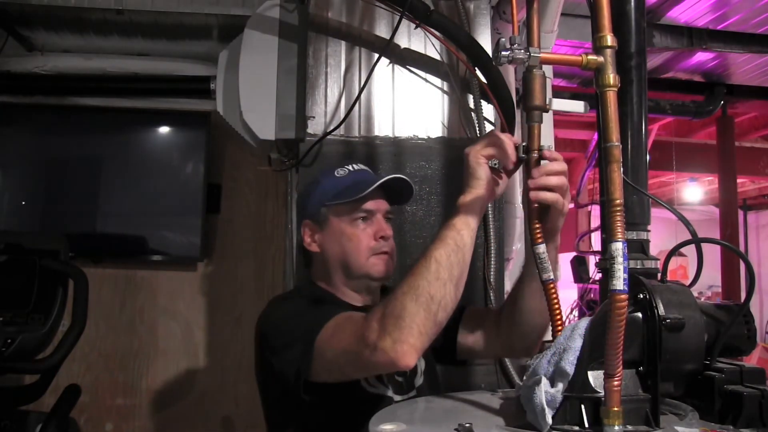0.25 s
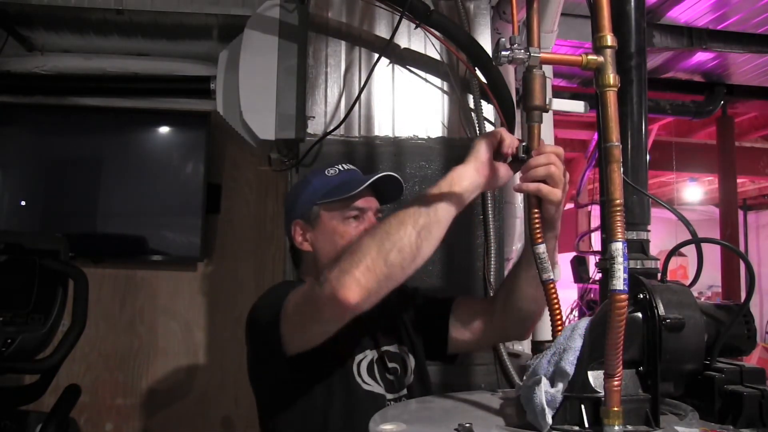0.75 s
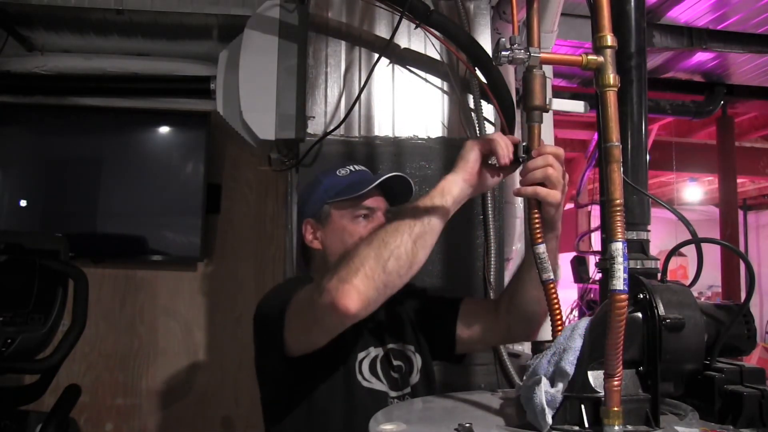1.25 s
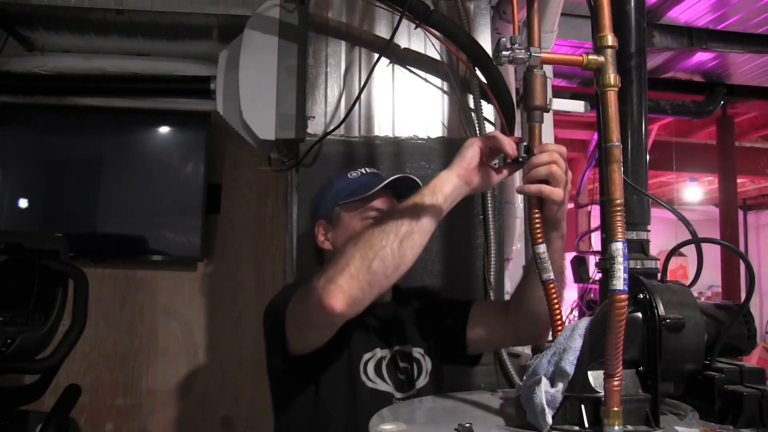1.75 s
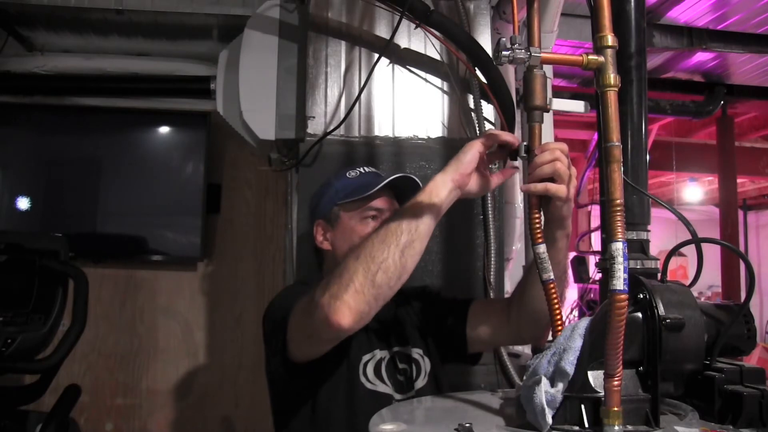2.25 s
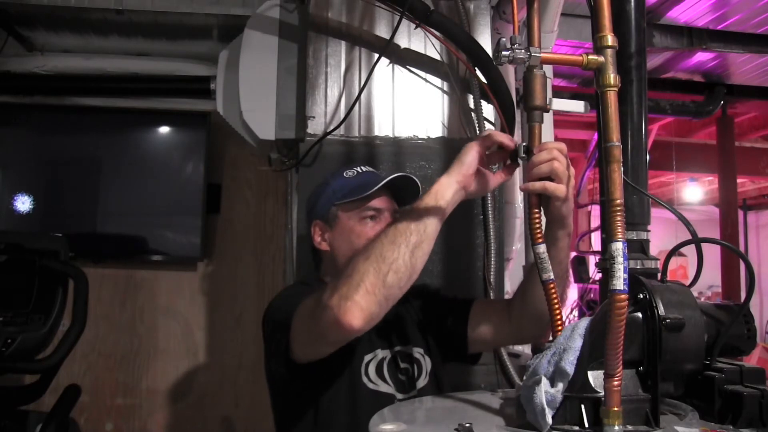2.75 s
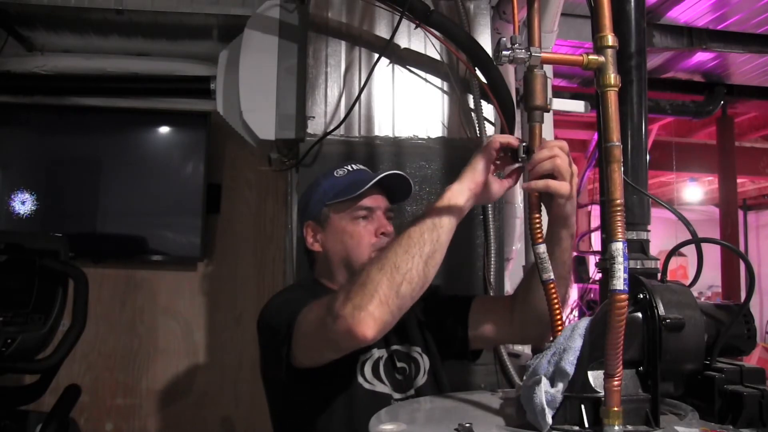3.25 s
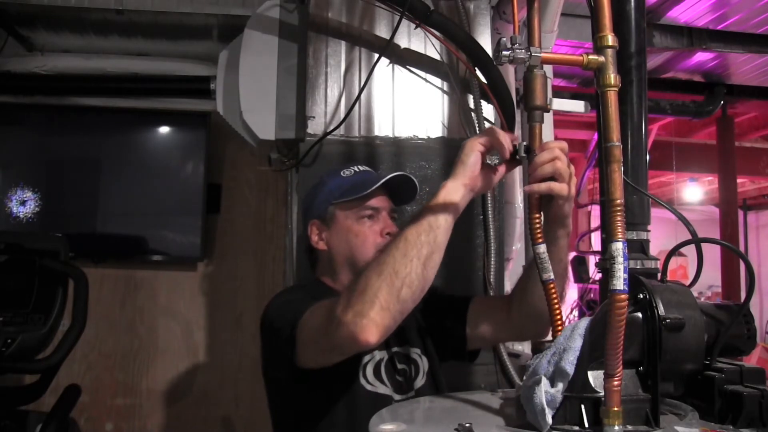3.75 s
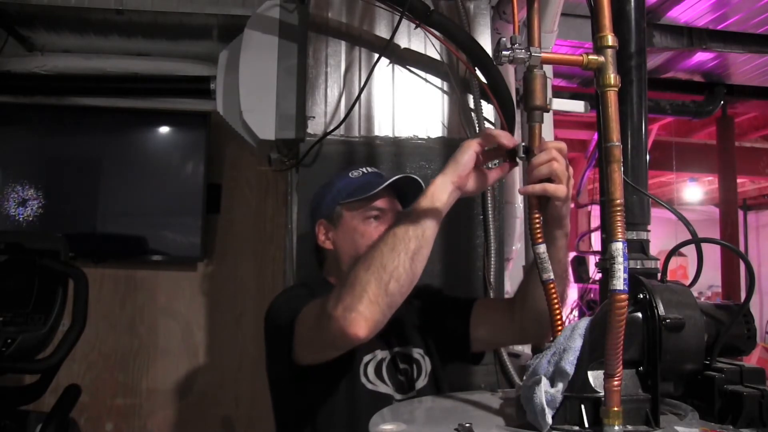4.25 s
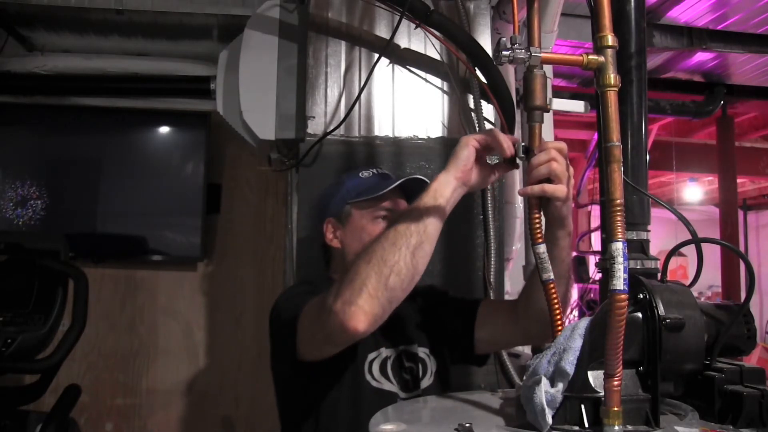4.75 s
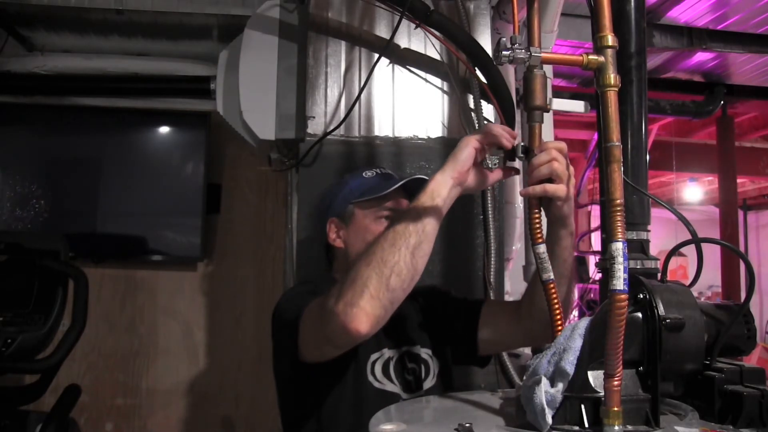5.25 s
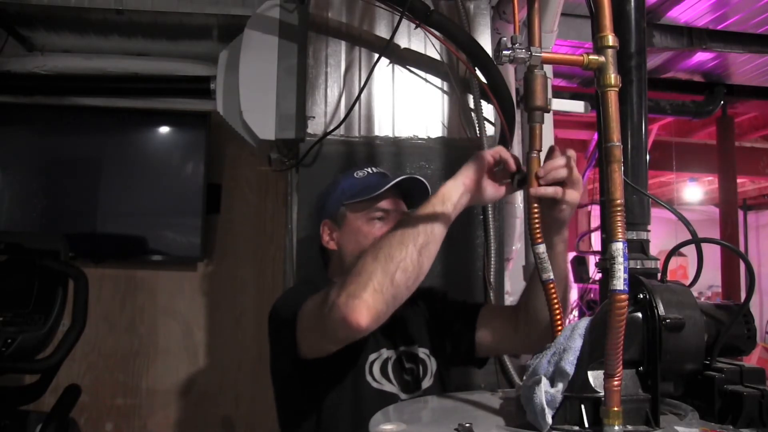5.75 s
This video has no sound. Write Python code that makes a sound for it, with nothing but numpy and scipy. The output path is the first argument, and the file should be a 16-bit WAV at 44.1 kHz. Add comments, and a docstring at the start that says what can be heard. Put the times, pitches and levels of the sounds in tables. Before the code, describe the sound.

Quiet basement air with a faint wavering hum. After a soft low rustle, small uneven clicks and muted taps come from a copper pipe held in both hands, with barely audible creeping jerks between. They end in one abrupt, booming metallic knock, a tiny rattle, then a crisper clink. Stereo microphone a few metres off, almost centred, with the room audible.

```python
"""Cutting a copper pipe by hand

A tubing cutter is worked round a copper pipe in a basement, a few metres away, over faint hum and hiss.
After a low rustle, the wheel slips in its groove with light, dull clicks: short blows on a gripped pipe.
Then the pipe lets go with a heavy knock, rattles, and metal strikes it once more. Each hard blow rings
fading sine waves for the metal and fading bands of noise for the pipework and the room."""
import sys
import numpy as np
from scipy import signal
from scipy.fft import rfft, irfft, next_fast_len
from scipy.io import wavfile

SR = 44100
rng = np.random.default_rng(int(sys.argv[2]) if len(sys.argv) > 2 else 0)


def dump_mix(stems):
    """Bounce the given channels to the path in sys.argv[1] as a 16-bit WAV at rate SR."""
    frames = np.atleast_2d(stems).T  # one column per channel
    limited = np.clip(frames, -1, 1)  # hard clip at full scale
    pcm = np.round(limited * 32767).astype(np.int16)
    wavfile.write(sys.argv[1], SR, pcm)


N = 265482
TIME = np.arange(N) / SR   # s

# In all tables t60 is the time to fade by 60 dB. A "blow" is a tuple: t/s, level/dB, bass/dB, treble/dB, contact/s
# the pipe breaks free, then is struck: t/s, level/dB, bass/dB, treble/dB, ring of cutter/dB, ring of cut end/dB
KNOCKS = [(5.5756, -10, -5.5, -2, -21.5, -25), (5.9536, -22, -4, 14, -18, -16)]
# the loose pipe rattles: t/s, level/dB, treble/dB
RATTLES = [(5.622, -24, 1), (5.633, -30.5, 10), (5.685, -27.5, -8.5), (5.709, -27.5, -3)]
# how alike left and right are in the air noise, hum and rustle: f/Hz, likeness (0-1)
AIR_LIKENESS = [(60, 0.95), (130, 0.95), (290, 0.75), (640, 0.15), (1400, 0.32), (3100, 0.59), (15000, 0.6)]


def from_db(db):
    """Turn decibels into a gain."""
    return 10 ** (np.asarray(db) / 20)


def at_hz(points, hz):
    """Read a table between its points, on a log-frequency axis."""
    known, values = np.transpose(points)
    return np.interp(np.log(np.maximum(hz, 1)), np.log(known), values)


def stereo_noise(gain_at, likeness, size):
    """Random phases on a given spectrum make two partly alike noises, with an rms of 1."""
    padded = next_fast_len(size, True)
    hz = np.arange(padded // 2 + 1) * SR / padded
    alike = np.clip(at_hz(likeness, hz), 0, 1)
    phase = 2 * np.pi * rng.random((2, len(hz)), np.float32)
    # likeness shifts energy from the side (left against right) to the mid (both together)
    gains = (gain_at(hz) * np.sqrt([1 + alike, 1 - alike])).astype(np.float32)
    mid, side = (np.cos(phase) + 1j * np.sin(phase)) * gains
    noise = irfft(np.array([mid + side, mid - side]), padded)[:, :size]
    return noise / noise.std()


def add(out, s, sound):
    """Mix a sound in at a given time in seconds."""
    start = int(np.clip(round(s * SR), 0, N - 1))
    out[:, start:start + sound.shape[-1]] += sound[..., :N - start]


def swell(start_s, end_s, rise_s, t60):
    """An envelope that rises, holds until its end and dies away."""
    rise = 1 - np.exp(-np.maximum(TIME - start_s, 0) / rise_s)
    fade = np.exp(-np.log(1000) * np.maximum(TIME - end_s, 0) / t60)
    return rise * fade


def tone_db(hz, bass_db, treble_db):
    """A heavy shove mostly moves the bass, a hard contact mostly the treble."""
    bass_share = at_hz([(300, 1), (620, 0.043)], hz)
    treble_share = at_hz([(800, 0.078), (1700, 0.94)], hz)
    return bass_db * bass_share + treble_db * treble_share


def dense_ring(blows, colour, crack_db, early_t60, tail_db, build_cycles, size=24000, hold_size=24):
    """Countless close modes, as noise bands: a crack, a quick first decay, then the tail of the room."""
    # fading time of the room: f/Hz, t60/s
    room_t60 = [(60, 2.7), (200, 0.48), (600, 0.55), (1800, 0.51), (4500, 0.48), (14000, 0.3)]
    # how alike left and right are in this ring: f/Hz, likeness (0-1)
    ring_likeness = [(60, .99), (150, 0.97), (300, 0.96), (640, 0.81), (1400, 0.74), (4000, 0.71),
                     (15000, 0.82)]
    bands = 33.5 * 2 ** (np.arange(28) / 3)   # band centres in Hz, three to the octave
    crack_t60 = 0.014   # s

    # split one noise into bands of equal loudness
    noise = rfft(stereo_noise(lambda f: from_db(at_hz(colour, f)), ring_likeness, 2 * size))
    edges = np.sqrt(bands[1:] * bands[:-1])
    nearest = np.searchsorted(edges, np.linspace(0, SR / 2, size + 1))
    in_band = nearest == np.arange(len(bands))[:, None, None]
    bank = irfft(noise.astype(np.complex64) * in_band)
    bank /= bank.std(axis=(1, 2), keepdims=True)

    # the energy of each band after a sudden blow, in steps of hold_size samples
    t, hz = TIME[hold_size // 2:size:hold_size], bands[:, None]
    crack = from_db(crack_db - 60 * t / crack_t60)
    early = from_db(-60 * t / early_t60)
    tail = from_db(tail_db - 60 * t / at_hz(room_t60, hz))
    energy = crack ** 2 + early ** 2 + tail ** 2
    energy *= (1 - np.exp(-t * hz / build_cycles)) ** 2   # low modes take longer to build up

    share = from_db(at_hz(colour, bands)) * np.sqrt(bands)   # wider bands hold more of the sound
    share /= np.linalg.norm(share)
    out = np.zeros((2, N))
    starts = rng.integers(0, size, len(blows))   # each blow uses another stretch of the noise
    for (s, level_db, bass_db, treble_db, contact, *_), start in zip(blows, starts):
        feed = np.exp(-hold_size / (max(contact, 1e-4) * SR))   # a long contact feeds its energy in slowly
        envelope = np.sqrt(signal.lfilter([1 - feed], [1, -feed], energy))
        envelope *= (share * from_db(level_db + tone_db(bands, bass_db, treble_db)))[:, None]
        envelope = np.repeat(envelope.astype(np.float32), hold_size, axis=1)
        add(out, s, np.einsum("bt,bct->ct", envelope, bank[:, :, start:start + size]))
    return out


def mode_ring(modes, blows, ring_db, rise_s, spread_db=2.5, port_angle=0.44, size=24000):
    """Each blow strikes every mode, a fading sine, anew; left and right are a little out of step."""
    hz, mode_db, t60 = np.transpose(modes)
    t, out = TIME[:size], np.zeros((2, N))
    angle = (2 * np.pi * np.outer(hz, t)).astype(np.float32)
    decay = np.exp(np.outer(-np.log(1000) / t60, t).astype(np.float32))
    waves = np.vstack([decay * np.sin(angle), decay * np.cos(angle)])
    # the phase gap grows up to 700 Hz and changes sign from one mode to the next
    skew = port_angle * np.minimum(hz / 700, 1) * (-1) ** np.arange(len(hz)) * [[1], [-1]]
    for s, level_db, bass_db, treble_db, contact, *_ in blows:
        luck_db = spread_db * rng.standard_normal(len(hz))   # no two blows excite the modes alike
        height = from_db(ring_db + mode_db + level_db + tone_db(hz, bass_db, treble_db) + luck_db)
        phase = 2 * np.pi * rng.random(len(hz)) + skew
        weights = np.hstack([height * np.cos(phase), height * np.sin(phase)]).astype(np.float32)
        rise = 1 - np.exp(-t / (abs(contact) + rise_s))   # a longer contact starts the ring more softly
        add(out, s, (weights @ waves) * rise)
    return out


def basement():
    """Steady air noise, plus narrow bands of noise that are heard as a few wavering hum lines."""
    # colour of the air noise: f/Hz, relative level per Hz/dB
    air = [(15, -40), (25, -16), (64, -10), (91, -25), (104, -7), (136, -4), (198, -6.5), (246, -6),
           (274, -11), (349, -8), (469, -13), (551, -11.5), (825, -15.5), (1850, -18), (15500, -34.5)]
    # hum of a distant appliance: f/Hz, level/dB, width/Hz
    hum = [(62.4, -69, 0.41), (158, -67, 5.9), (339, -71, 14), (1540, -74.5, 12), (1800, -72, 8.3),
           (2090, -77.5, 7.4)]
    air_db = -55.7
    hz = np.arange(SR * 2) / 4
    parts = [(air_db, from_db(at_hz(air, hz)) ** 2)]
    for centre, level_db, width in hum:
        parts.append((level_db, 1 / (1 + ((hz - centre) / width) ** 2) ** 2))
    power = sum(from_db(level_db) ** 2 * shape / shape.sum() for level_db, shape in parts)
    noise = stereo_noise(lambda f: np.sqrt(np.interp(f, hz, power)), AIR_LIKENESS, N)
    return np.sqrt(power.sum()) * noise


def rumble():
    """Low noise swells, holds and dies away as a muffled rustle; short swells make soft bumps."""
    # colour of the rustle: f/Hz, relative level per Hz/dB
    rumble_colour = [(40, -12), (90, -11), (130, -3.5), (170, -2.5), (200, -5.5), (260, -0.5), (340, -9.5),
                     (480, -21.5), (800, -20.5), (2000, -68)]
    # soft low bumps: t/s, level/dB
    bumps = [(0.604, -47.5), (1.02, -46.5), (3.92, -44)]
    level = from_db(-53) * swell(start_s=0.6, end_s=1.27, rise_s=0.043, t60=1.74)
    for s, bump_db in bumps:
        level = level + from_db(bump_db) * swell(s, s, rise_s=0.0058, t60=0.2)
    return level * stereo_noise(lambda f: from_db(at_hz(rumble_colour, f)), AIR_LIKENESS, N)


def creep(count):
    """Between slips the rollers creep round the pipe in faint jerks at uneven intervals."""
    from_s, to_s = 2.5, 5.5
    level_db, spread_db, bass_db, treble_db, contact_s = -62, 1.5, 9.5, 0.5, 0.01
    times = from_s + (to_s - from_s) * (np.arange(count) + rng.random(count)) / count
    return [(s, level_db + spread_db * rng.standard_normal(), bass_db, treble_db, contact_s) for s in times]


def slip_blows():
    """The wheel slips with a bright tick, then catches again with a dull thud; creep is added."""
    # slips of the wheel: t/s, tick level/dB, thud level/dB, brightness/dB, contact/s
    slip_table = [(1.406, -43, -42.5, 2, 0.0015), (1.438, -36.5, -38.5, 1.5, 0.00051),
                  (1.594, -46.5, -65, 7.5, 0.00034), (1.805, -48, -50.5, -12, 0.015),
                  (2.165, -46, -47.5, -11, 0.013), (2.268, -62.5, -66, 12.5, .005),
                  (2.315, -47, -59, -19, 0.0028), (2.391, -43, -46.5, -6.5, 0.0031),
                  (2.44, -44.5, -54, -5, .01), (2.473, -38, -56, -19, 0.00042),
                  (2.682, -50, -56, -3, 0.0044), (2.728, -41.5, -50.5, -2.5, .012),
                  (2.834, -51, -53, -21, 0.0088), (3.002, -38, -39, -3.5, 0.00062),
                  (3.094, -42, -44, -8, .003), (3.322, -53, -52, -18, 0.0053),
                  (3.56, -48.5, -51.5, -9, .02), (3.767, -42.5, -37.5, -0.5, 0.0046),
                  (3.906, -40.5, -41, -6.5, 0.0041), (4.222, -50.5, -46, -1.5, .011),
                  (4.53, -48, -57, -8, 0.018), (4.84, -43.5, -46.5, -2, 0.0017),
                  (5.0125, -38.5, -43, 0, 0.0012), (5.137, -42, -45.5, -16, .014),
                  (5.331, -48.5, -66, 3, 0.00063), (5.409, -40.5, -47.5, -12.5, 0.0032),
                  (5.506, -45, -41, -28, 0.0072)]
    tick_bass_db, tick_treble_db = -5, 3
    thud_bass_db, thud_treble_db = 6, -9
    bass_loss = 0.19   # dB per dB of brightness: the harder the slip, the thinner its tick
    blows = creep(count=26)
    for s, tick_db, thud_db, bright_db, contact in slip_table:
        caught_s = s + 0.012 + 1.2 * contact   # a slower slip takes longer to catch
        thin_bass_db = tick_bass_db - bass_loss * bright_db
        blows += [(s, tick_db, thin_bass_db, tick_treble_db + bright_db, contact),
                  (caught_s, thud_db, thud_bass_db, thud_treble_db + bright_db, contact)]
    return blows


def slips():
    """The wheel jerks forward in its groove and rings the pipe, muffled by the hands."""
    # colour of the dense ring of light slips: f/Hz, relative level per Hz/dB
    slip_colour = [(60, -29), (150, -6.5), (230, -8.5), (330, -0.5), (470, 0.5), (620, -4), (820, 1),
                   (1200, -8), (2000, -9.5), (2700, -16.5), (3400, -25), (4400, -26), (7000, -38),
                   (15000, -68)]
    # modes of the pipe while both hands grip it: f/Hz, level/dB, t60/s
    gripped = [(182.6, -26.5, 0.97), (286, -12.5, 0.39), (343, -15, 0.86), (430.2, -8, 0.21),
               (472.8, -11.5, 0.23), (565.3, -2.5, 0.12), (721, -12, 0.34), (772, -17, 0.25),
               (790, -46, 0.091), (918, -13.5, 0.22), (995, -14.5, 0.33), (1190, -25, 0.42),
               (1500, -17, 0.28), (1556, -26, 0.16), (1885, -21.5, .3), (2060, -24.5, .3),
               (2410, -17, 0.21), (2590, -23.5, 0.18), (2680, -50, 0.11), (2850, -45, 0.12),
               (4340, -45, 0.11)]
    blows = slip_blows()
    return (dense_ring(blows, slip_colour, crack_db=8, early_t60=0.15, tail_db=-6.5, build_cycles=1.54)
            + mode_ring(gripped, blows, ring_db=3.5, rise_s=0.0036))


REBOUND_LAG_S = 0.0105   # the pipe swings back this long after a knock


def knock_blows():
    """Every knock is a graze of metal, the hit and a slower rebound; rattles are single soft blows."""
    rattle_bass_db, rattle_contact_s = 3.5, 0.0042
    graze_lead_s, graze_db, graze_contact_s = 0.0025, -24.5, 0.0004
    knock_contact_s = 0.0003
    rebound_bass_db, rebound_treble_db, rebound_contact_s = -0.5, -2.5, 0.003
    blows = [(s, level_db, rattle_bass_db, treble_db, rattle_contact_s) for s, level_db, treble_db in RATTLES]
    for s, level_db, bass_db, treble_db, *_ in KNOCKS:
        blows += [(s - graze_lead_s, graze_db, bass_db, treble_db, graze_contact_s),
                  (s, level_db, bass_db, treble_db, knock_contact_s),
                  (s + REBOUND_LAG_S, level_db, rebound_bass_db, rebound_treble_db, rebound_contact_s)]
    return blows


def knocks():
    """Hard metal contacts shake the whole pipe run and set the cutter and the cut end ringing."""
    # colour of the dense ring of hard knocks: f/Hz, relative level per Hz/dB
    knock_colour = [(35, -14), (52, -25), (67, -14), (90, -10), (170, 0.5), (340, 2), (450, -3.5),
                    (750, -1), (1100, -8.5), (1800, -10.5), (3100, -24.5), (4300, -23), (5500, -28.5),
                    (9500, -36.5), (15000, -50.5)]
    # modes of the free pipe run and the room round it: f/Hz, level/dB, t60/s
    pipe = [(63.6, -18, 0.83), (75.1, -16, 1.53), (112.7, -8.5, 0.78), (163.5, -9.5, 0.72),
            (176.5, -8, 0.62), (237.7, -14, 0.58), (286.5, -24, 0.52), (328.7, -12.5, 0.6),
            (431, -14, 0.57), (445, -20, 0.64), (557.6, -24, 1), (567, -10.5, 0.54), (693, -17.5, 0.52),
            (761, -8, 0.43), (792, -10, 0.21), (880, -27, 0.37), (882, -0.5, 0.14), (989, -17.5, 0.47),
            (1090, -28, 0.21), (1227, -26, 0.098), (1360, -21.5, 0.37), (1560, -24, 0.43), (1606, -30, .35),
            (1850, -26, 0.15), (1880, -20, 0.36), (2030, -34, 0.19), (2335, -24, 0.42), (2920, -35, 0.32),
            (3020, -30.5, 0.41)]
    # modes of the steel cutter: f/Hz, level/dB, t60/s
    cutter = [(4160, -2, 0.039), (3900, -2, 0.03), (4180, -11, 0.11), (3930, -25, 0.092),
              (4200, 5.5, 0.047), (4270, -5, 0.078), (4600, -20, 0.22), (4550, -12, 0.13),
              (4590, -17, 0.16), (5180, -22, 0.086), (6620, -34, .1), (8600, -29, 0.081)]
    # modes of the short, freshly cut end of the tube: f/Hz, level/dB, t60/s
    cut_end = [(964, -14, 0.22), (1130, -14, 0.18), (1234, -2.5, 0.17), (1373, 6, 0.032), (1575, -11, 0.27),
               (1710, -11, 0.073), (1844, -8, 0.24), (1954, -19, 0.31), (2090, -12.5, 0.18),
               (2900, -9.5, 0.07), (3400, -23, .1)]
    rebound_cutter_db = -13.5   # the rebound rings the cutter again, more softly
    rattle_cutter_db, rattle_end_db = -9, -1   # rings relative to the rattle
    blows = knock_blows()
    on_cutter, on_end = [], []
    for s, *_, cutter_db, end_db in KNOCKS:
        on_cutter += [(s, cutter_db, 0, 0, 0),
                      (s + REBOUND_LAG_S, cutter_db + rebound_cutter_db, 0, 0, 0)]
        on_end.append((s, end_db, 0, 0, 0))
    for s, level_db, treble_db in RATTLES:
        on_cutter.append((s, level_db + rattle_cutter_db, 0, treble_db, 0))
        on_end.append((s, level_db + rattle_end_db, 0, 0, 0))
    return (dense_ring(blows, knock_colour, crack_db=2.5, early_t60=0.1, tail_db=-8.0, build_cycles=1.35)
            + mode_ring(pipe, blows, ring_db=-4.0, rise_s=0.0047, spread_db=1.5)
            + mode_ring(cutter, on_cutter, ring_db=-6.0, rise_s=0.00016, spread_db=2.0)
            + mode_ring(cut_end, on_end, ring_db=-3.0, rise_s=0.00064, spread_db=3.0))


def scene():
    """All sounds together, slightly louder on the right than on the left."""
    right_db = 0.3
    return (basement() + rumble() + slips() + knocks()) * from_db([[-right_db], [right_db]])


def record(dry):
    """A steep low-pass filter cuts the highest treble."""
    cutoff_hz = 15600
    return signal.sosfilt(signal.ellip(10, .1, 80, cutoff_hz, fs=SR, output="sos"), dry)


dry = scene()
out = record(dry)
dump_mix(out)
```